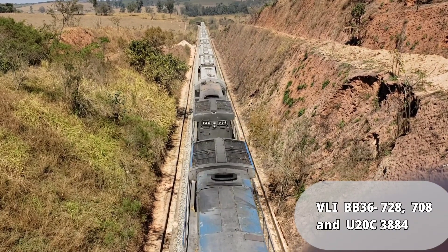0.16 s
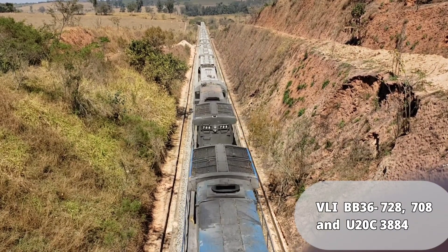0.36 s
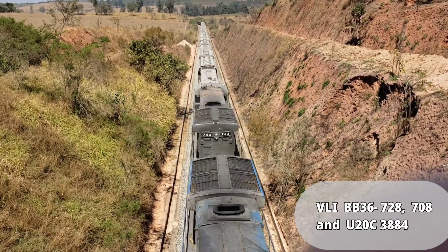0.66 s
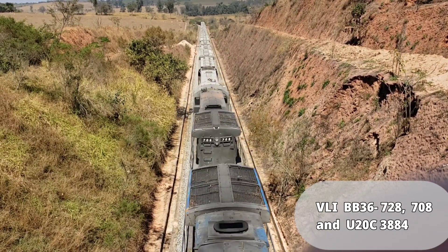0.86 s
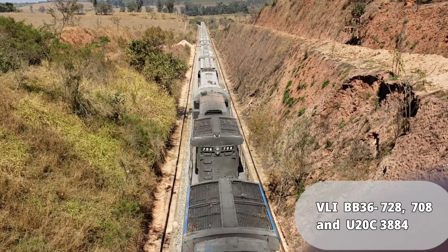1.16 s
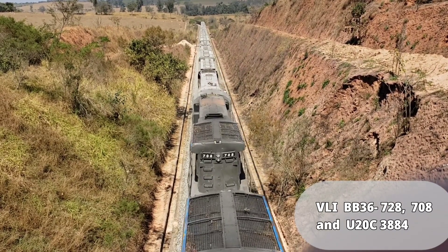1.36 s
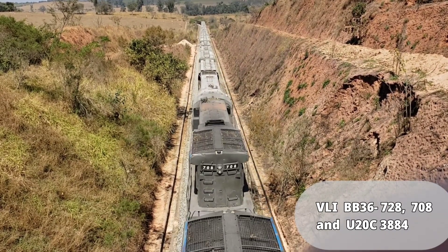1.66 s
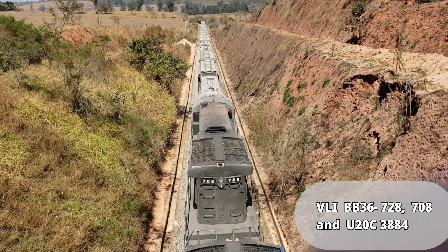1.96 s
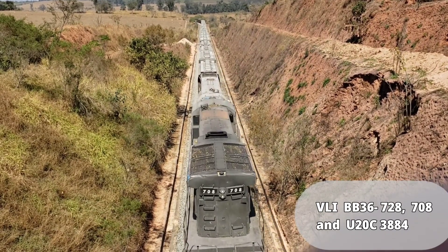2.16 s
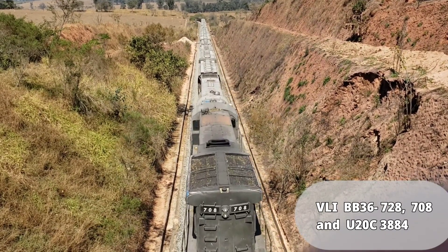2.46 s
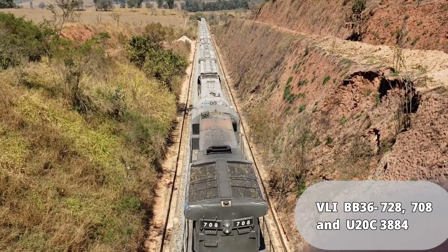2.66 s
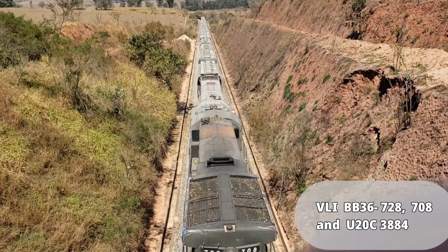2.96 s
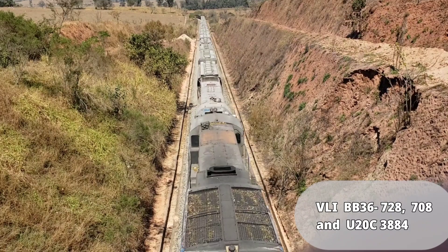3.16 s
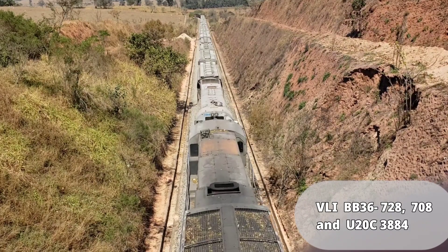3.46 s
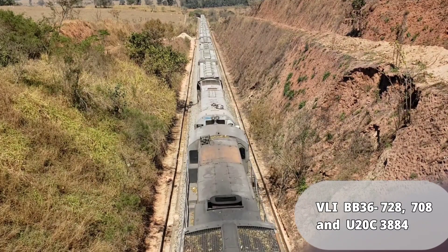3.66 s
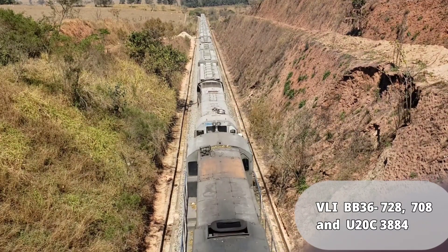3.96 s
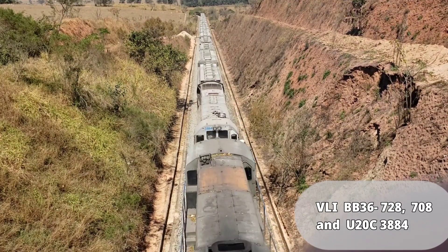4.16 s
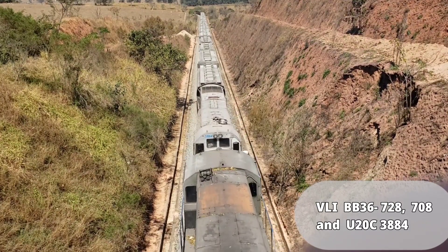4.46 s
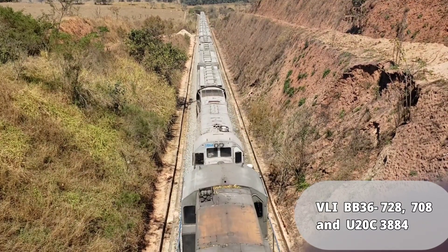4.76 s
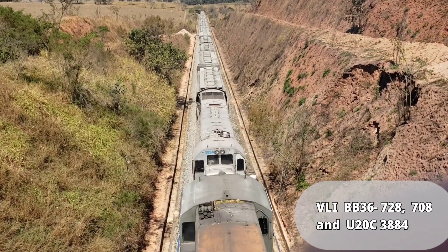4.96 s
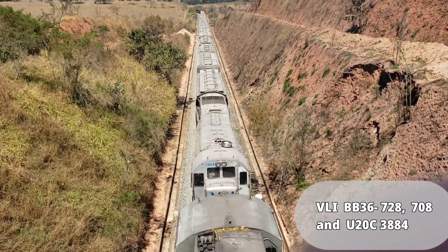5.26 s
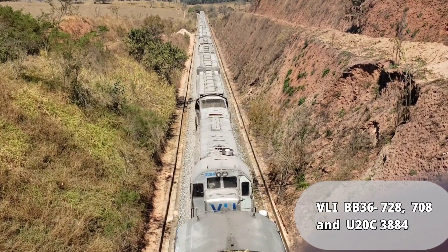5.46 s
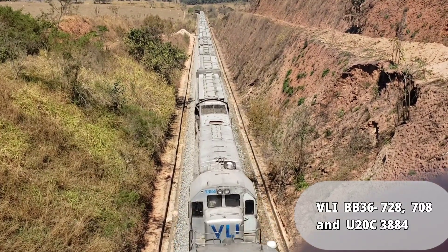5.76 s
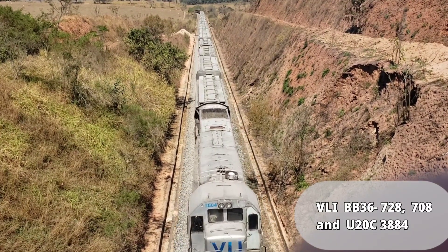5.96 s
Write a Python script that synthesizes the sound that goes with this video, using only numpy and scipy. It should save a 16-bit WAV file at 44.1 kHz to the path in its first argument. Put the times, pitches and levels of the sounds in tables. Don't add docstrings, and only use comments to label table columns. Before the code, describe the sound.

A diesel locomotive's booming, pulsing exhaust roar passes close below a bridge, drops abruptly, then rolling wheels and ringing rails lead to a second engine's boom.

```python
import sys
import numpy as np
from scipy import signal
from scipy.fft import rfft, irfft
from scipy.io import wavfile

SR = 44100
rng = np.random.default_rng(int(sys.argv[2]) if len(sys.argv) > 2 else 0)


def output_pcm(signal):
    pcm = np.clip(np.atleast_2d(signal).T, -1, 1) * 32767
    wavfile.write(sys.argv[1], SR, np.round(pcm).astype(np.int16))


def gain_from_db(level_db):
    decades = np.asarray(level_db, float) / 20
    return 10 ** decades


N = 269010
TIME_S = np.arange(N) / SR


def rms_one(x):
    return x / np.sqrt(np.mean(x ** 2) + 1e-20)


def in_time(rows):
    s, *columns = np.transpose(rows)
    return [np.interp(TIME_S, s, column) for column in columns]


def ramp(start_s, end_s):
    return np.interp(TIME_S, [start_s, end_s], [0, 1])


def at_hz(points, hz):
    point_hz, value = np.transpose(points)
    return np.interp(np.log(hz), np.log(point_hz), value)


def drift(rate_hz):
    r = np.exp(-80 * np.pi * rate_hz / SR)
    slow = signal.lfilter([1], [1, -2 * r, r * r], rng.standard_normal(N // 40 + 2002))
    slow = slow[2000:]
    return np.interp(np.arange(N) / 40, np.arange(len(slow)), rms_one(slow))


def coloured(spectrum, low_hz, high_hz):
    hz = np.fft.rfftfreq(N, 1 / SR) + 1
    edges = 1 / np.sqrt((1 + (low_hz / hz) ** 12) * (1 + (hz / high_hz) ** 12))
    noise = rfft(rng.standard_normal(N))
    return rms_one(irfft(noise * gain_from_db(at_hz(spectrum, hz)) * edges, N))


# (frequency [Hz], left-right correlation [0 to 1])
PORT_LIKENESS = [(60, 0.59), (300, 0.97), (500, 0.83), (1000, 0.15), (2000, 0.85), (3000, 0.04),
                 (16000, 0.029)]


def diffuse(spectrum, low_hz, high_hz):
    side_colour = []
    for hz, likeness in [(hz, np.clip(c, 0, .99)) for hz, c in PORT_LIKENESS]:
        side_colour.append((hz, likeness))
    alike = side_colour
    side_colour = [(hz, db + 10 * np.log10((1 - at_hz(alike, hz)) / (1 + at_hz(alike, hz)))) for hz, db in spectrum]
    hz = np.geomspace(low_hz, high_hz, num=200)
    side_power = np.sum(hz * gain_from_db(2 * at_hz(side_colour, hz)))
    mid_power = np.sum(hz * gain_from_db(2 * at_hz(spectrum, hz)))
    mid = coloured(spectrum, low_hz, high_hz)
    side = np.sqrt(side_power / mid_power) * coloured(side_colour, low_hz, high_hz)
    return mid + side * [[1], [-1]]


# (time [s], four-stroke cycle rate [Hz])
ENGINE_CYCLE = [(0, 8.975), (1.6, 8.96), (2.6, 8.88), (3.6, 8.75), (4.5, 8.73), (6.1, 8.76)]


def engine_turns():
    return np.cumsum(in_time(ENGINE_CYCLE)[0]) / SR


# (time [s], level [dB])
BOOM_PASSING = [(0, -19.5), (0.599, -19), (1.8, -23.5), (3, -19), (3.8, -36), (4.3, -34), (4.7, -49.5),
                (5.1, -26.5), (6.1, -32)]
# (time [s], level [dB])
BOOM_FOLLOWING = [(2.4, -50), (3.4, -28.5), (4.6, -28), (4.9, -38.5), (5.2, -26.5), (5.6, -26.5),
                  (6.1, -27)]
# (lead [cycles], lead gained [cycles/s], echo share [gain],
# echo lag [cycles], lag growth [cycles/s])
STACK_ECHOES = [
    (.0282, .007, .345, .0968, .0319),
    (.5713, .0339, .85, .4392, .0611),
]
# (order [per cycle], level [dB])
PIPE_ORDERS = [(11, -3), (12, 1.5), (13, 1.8)]


def pipe_boom(turns):
    out = 0
    for rows, (lead, gained, echo, lag, growth) in zip((BOOM_PASSING, BOOM_FOLLOWING), STACK_ECHOES):
        stack_db, = in_time(rows)
        direct = 2 * np.pi * (turns + lead + gained * TIME_S)
        echoed = direct - 2 * np.pi * (lag + growth * TIME_S)
        for order, db in PIPE_ORDERS:
            turn = 4.17 * (order > 12.5)
            wave = np.cos(order * direct - turn) + echo * np.cos(order * echoed - turn)
            out = out + np.sqrt(2) * gain_from_db(stack_db + db) * wave
    return out


# (order [per cycle], level [dB])
OTHER_ORDERS = [(5, -9), (6, -4.5), (8, -6), (9, -47), (10, 2), (14, -31), (15, 4.5), (16, -5), (17, -4.5),
                (19, -2), (20, -4), (21, -5.5), (22, -4), (23, -9.5)]


def other_orders(turns):
    deck, coming = ramp(1.68, 3.2), ramp(4.2, 4.4)
    upper_db = -16 + 0.64 * in_time(ROAR_SWELL)[0] - 9 * deck + 2 * coming
    per_order_db = -0.42 * deck + 0.0535 * coming
    walls = np.interp(TIME_S, [2.5, 3.5], [.15, .9])
    top = [(order, -15 - 0.1 * (order - 25)) for order in range(25, 34)]
    out = 0
    for order, db in OTHER_ORDERS + top:
        angle = 2 * np.pi * (order * turns + rng.random())
        beat = (1 + walls * drift(0.46)) * np.cos(angle) + walls * drift(0.97) * np.sin(angle)
        beat = beat / np.sqrt(1 + 2 * walls ** 2)
        level_db = upper_db + (order - 14) * per_order_db if order > 13 else -26
        out = out + gain_from_db(db + level_db - 4) * beat
    return out


# (time [s], level [dB])
ROAR_SWELL = [(0, -5), (.5, -4.5), (1.15, 0.0), (1.9, -4.5)]
# (time [s], level [dB])
DECK_SHADE = [(1.9, -2), (2.15, -8.5), (2.2, -10.5), (2.55, -16), (2.85, -19), (2.92, -31), (4.5, -40)]
# (time [s], lift [dB])
PLUME_GUSTS = [(2.09, 4.5), (2.27, 4), (2.358, 5.5), (2.51, 7.5), (2.61, 5)]
# (best level [dB], share of swell [ratio], gain towards the jet axis [dB/s],
# share of shade [ratio], share of gusts [ratio])
ROAR_LAYERS = [
    (-37.5, 0.1, 2, 0.72, .2),
    (-34.5, 0.73, 1.7, 0.65, .5001),
    (-22, 1.05, 1.06, 1, 1.1),
    (-26.5, 0.81, 0.6, 1.5, 0.68),
    (-36, 0.27, 3.5, 1.4, 0.28),
]


def roar_levels():
    swell_db, = in_time(ROAR_SWELL)
    shade_s, shade_db = np.transpose(DECK_SHADE)
    gust_db = sum(db * np.exp(-((TIME_S - at) / 0.025) ** 2) for at, db in PLUME_GUSTS)
    levels = []
    for (db, swell, axis_db, shade, gust), late_s in zip(ROAR_LAYERS, [0.35, 0, 0, 0, 0]):
        level = db + swell * swell_db + axis_db * np.minimum(TIME_S, shade_s[0])
        level = level + shade * np.interp(TIME_S - late_s, shade_s, shade_db)
        levels.append(level + gust * gust_db)
    return levels


# (time [s], peak level [dB])
STACK_CRACKS = [(0.383, -22.5), (0.6236, -12), (0.9084, -9), (1.046, -6), (1.274, -20), (1.8906, -21),
                (2.1395, -20), (2.254, -20.5), (2.5062, -24.5)]


def cracks():
    s, peak_db = np.transpose(STACK_CRACKS)
    clicks = np.zeros(N)
    clicks[np.round(s * SR).astype(int)] = 1.1 * gain_from_db(0.084 * (peak_db + 16))
    fade = np.exp(-1 / (0.0033 * SR))
    return 1 + signal.lfilter([1], [1, -fade], clicks + 1e-18)


# (place [share of cycle], throat lift [dB], hiss lift [dB], width [share of cycle])
CYLINDER_PUFFS = [(.19, 4, 6, 0.072), (.43, 2, 7.5, 0.089), (.57, 5, 5.5, 0.026), (.83, 4.5, 4, 0.015)]
# (frequency [Hz], density [dB per Hz])
LOW_COLOUR = [(220, -33), (380, -12.5), (449, -10.5), (489, -4), (660, -2), (744, -2), (807, -8.5),
              (1000, -7), (1210, -1.5), (1500, -7), (1950, -12), (3300, -120)]
# (frequency [Hz], density [dB per Hz])
OPEN_THROAT = [(820, -18), (1400, -7.5), (1470, -12), (1660, -2.5), (1810, -6.5), (1930, -2), (2240, 0.5),
               (2690, -1.5), (3030, -19), (3400, -10.5), (4420, -29), (7480, -120)]
# (frequency [Hz], density [dB per Hz])
SHADED_THROAT = [(820, -13), (1400, 1), (1470, -12), (1680, 5.5), (1830, -5.5), (2280, 0.5), (2470, -6),
                 (2680, 4.5), (2950, -10), (3400, -7.5), (4420, -37), (7480, -120)]
# (frequency [Hz], density [dB per Hz])
HISS_COLOUR = [(1940, -18), (3300, -2), (3550, -2), (4240, -1), (5300, -3.5), (7820, -12.5), (8810, -14.5),
               (10600, -11), (13000, -11), (14900, -7), (15900, 1)]


def roar(turns):
    low_db, middle_db, throat_db, hiss_db, top_db = roar_levels()
    throat_puff, hiss_puff = 0, 0
    uneven = rng.normal(1, .22, (int(turns[-1]) + 1, len(CYLINDER_PUFFS)))
    for k, (share, throat_lift, hiss_lift, width) in enumerate(CYLINDER_PUFFS):
        bump = np.exp(-((turns % 1 - share) / width) ** 2) * uneven[turns.astype(int), k]
        throat_puff = throat_puff + throat_lift * bump
        hiss_puff = hiss_puff + hiss_lift * bump
    flutter = .8 * drift(60)
    shade = np.interp(TIME_S, [1.7, 2.2], [0, np.pi / 2])
    throat = np.cos(shade) * coloured(OPEN_THROAT, 1470, 3800)
    throat += np.sin(shade) * coloured(SHADED_THROAT, 1300, 3900)
    out = gain_from_db(low_db + 0.95 * throat_puff + 1.2 * drift(29)) * coloured(LOW_COLOUR, 440, 840)
    out += gain_from_db(middle_db + 0.55 * throat_puff + flutter) * coloured(LOW_COLOUR, 855, 1460)
    out += gain_from_db(throat_db - 1.14 + throat_puff + flutter) * cracks() * throat
    out += gain_from_db(hiss_db - 1 + hiss_puff + flutter) * coloured(HISS_COLOUR, 2270, 6160)
    out += gain_from_db(top_db + 3 + 0.92 * hiss_puff + flutter) * coloured(HISS_COLOUR, 6120, 13300)
    return out


# (width [Hz], share left at centre on the right [ratio], on the left [ratio])
CANCEL_DEPTH = [(1060, 0.67, 1), (740, 1, 1), (1900, 0.48, 1), (1100, 0.96, 0.99)]
# (centre before the swing [Hz], centre after [Hz], bend [exponent])
CANCEL_PATH = [(3400, 4210, 2), (6940, 10500, 1.2), (10350, 13200, .6), (13200, 15200, 0.91)]


def ports(x):
    hz, s, cells = signal.stft(x, SR, nperseg=1024)
    swing_s = 2.54
    swing = np.minimum(s / swing_s, 1)
    lag_ms = 0.094 * np.minimum(s / swing_s, 1.3) ** 2
    peak_db = -2 + 13.5 * swing
    second_share = 0.52 + 0.48 * np.exp(-s / .25)
    hz = hz[:, None]
    left = np.exp(-2j * np.pi * 7 * np.tanh(hz / 7000) * lag_ms)
    right = gain_from_db(-1.2 / (1 + (hz / 800) ** 4) + peak_db * np.exp(-((hz - 7700) / 900) ** 2)) + 0j
    for path, depth, turn in zip(CANCEL_PATH, CANCEL_DEPTH, [1, second_share, 1, 1]):
        start_hz, end_hz, bend = path
        width, right_share, left_share = depth
        sway = 1 + .025 * drift(8)[np.minimum(s * SR, N - 1).astype(int)]
        centre = (start_hz + (end_hz - start_hz) * swing ** bend) * sway
        off = centre ** 2 - hz ** 2
        around = off + 1j * width * hz
        right = right * (off - 1j * turn * right_share * width * hz) / around
        left = left * (off + 1j * left_share * width * hz) / around
    direct = signal.istft(cells * np.array([left, right]), SR, nperseg=1024)[1][:, :N]
    bright = signal.sosfilt(signal.butter(2, 2500, "high", fs=SR, output="sos"), x)
    walls = np.array([np.roll(bright, lag) for lag in (1517, 2203)])
    walls_db = np.interp(TIME_S, [1.9, 2.3], [-10, -5])
    return direct + gain_from_db(walls_db) * walls


# (time [s], frequency [Hz], level [dB])
LOW_HUM = [(0, 246, -39), (.4, 241.6, -26.5), (1.5, 247.3, -29), (2.5, 248, -31.5), (3.5, 247.9, -39.5),
           (4.2, 248.6, -53), (4.6, 262.5, -42.5), (6.1, 264.5, -39)]
# (time [s], frequency [Hz], level [dB])
HIGH_HUM = [(0, 559, -40.5), (1, 562, -69), (2.6, 555, -49), (3.8, 546.7, -60), (6.1, 553, -61)]


def hum(rows):
    hz, db = in_time(rows)
    phase = 2 * np.pi * np.cumsum(hz + 1.083 * drift(4)) / SR
    return np.sqrt(2) * gain_from_db(db + 2 * drift(10)) * np.sin(phase)


def bass(turns):
    centre = pipe_boom(turns) + other_orders(turns) + hum(LOW_HUM) + hum(HIGH_HUM)
    wall = gain_from_db(-29) * np.roll(centre, 1500)
    return np.array([centre + wall, centre - wall]) * gain_from_db([[.65], [-.65]])


# (time [s], level [dB])
BODY_CLOSENESS = [(0, -45.5), (2.4, -44.5), (2.9, -57), (3.5, -59.5), (4.06, -61.5), (4.26, -54.5),
                  (4.66, -47), (5.25, -46), (5.7, -49.5), (6.1, -45)]
# (frequency [Hz], density [dB per Hz])
NEXT_COLOUR = [(900, -38), (1200, 10.5), (1450, -25), (1750, 9), (2300, 8), (2750, 5), (3100, -35)]


def engine_bodies():
    body_db, = in_time(BODY_CLOSENESS)
    return gain_from_db(body_db - 2 + drift(2.9)) * diffuse(NEXT_COLOUR, 900, 2900)


# (middle [s], length [s], level [dB])
RAIL_CONTACTS = [
    [(4.02, 0.068, -51), (4.7, 0.38, -54), (5.02, 0.11, -51.5), (5.32, 0.31, -48.5), (5.6, .15, -53.5),
     (5.97, 0.28, -50)],
    [(3.95, .06, -54), (4.4, 0.36, -49.5), (4.75, 0.42, -59), (5.1, 0.13, -44), (5.42, 0.077, -48),
     (5.6, .12, -51), (6.05, .16, -47)],
]


def rails():
    out = 0
    for rows, (hz, width) in zip(RAIL_CONTACTS, [(1290, 30), (1680, 62)]):
        resonance = [(hz - 3 * width, -30), (hz - width, -4), (hz, 0), (hz + width, -4), (hz + 3 * width, -30)]
        contact = sum(gain_from_db(db) / (1 + (2 * (TIME_S - at) / length) ** 4) for at, length, db in rows)
        out = out + contact * gain_from_db(0.94 * drift(21)) * diffuse(resonance, 900, 2200)
    return out


# (frequency [Hz], density [dB per Hz])
RUMBLE_COLOUR = [(25, -30), (38, -14), (60, -13), (90, -11), (115, -10), (140, -11), (210, -15), (375, -19),
                 (450, -34)]


def rumble():
    level_db = -24.5 - 9.5 * ramp(2.54, 3.33) + 3.5 * ramp(5.3, 5.66)
    return gain_from_db(level_db + drift(7.6)) * diffuse(RUMBLE_COLOUR, 25, 456) * gain_from_db([[.8], [-.8]])


# (frequency [Hz], density [dB per Hz])
ROLLING_COLOUR = [(300, -12), (390, 1.5), (466, -12.5), (560, -7.5), (720, -9), (900, -14.5), (1500, -13),
                  (2700, -13.5), (3200, -18.5), (7900, -25.5), (8900, -29.5), (13000, -28), (16000, -34)]


def rolling():
    body_db, = in_time(BODY_CLOSENESS)
    level_db = -41.5 + .25 * (body_db - body_db.max())
    wheels = gain_from_db(level_db + 0.29 * drift(13)) * diffuse(ROLLING_COLOUR, 434, 9400) * gain_from_db([[.5], [-.5]])
    return wheels + gain_from_db(-58) * diffuse(ROLLING_COLOUR, 8500, 26000)


def scene():
    turns = engine_turns()
    return bass(turns) + ports(roar(turns)) + engine_bodies() + rails() + rumble() + rolling()


def roll_off(x):
    return signal.sosfilt(signal.butter(12, 16080, fs=SR, output="sos"), x)


def record(dry):
    dry = signal.sosfilt(signal.butter(2, 36, "high", fs=SR, output="sos"), dry)
    mix = signal.sosfilt(signal.ellip(10, .5, 70, 15500, fs=SR, output="sos"), dry)
    return roll_off(mix)


dry = scene()
out = record(dry)
output_pcm(out)
```